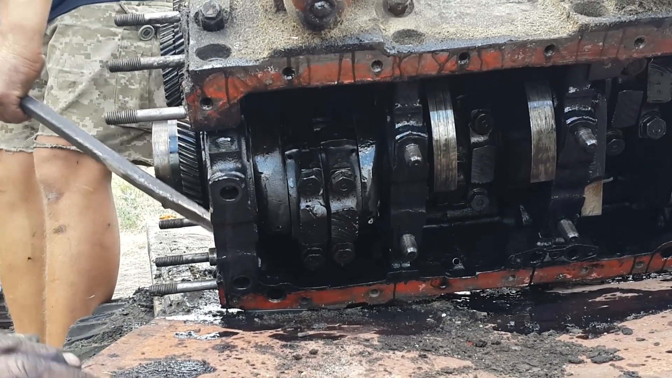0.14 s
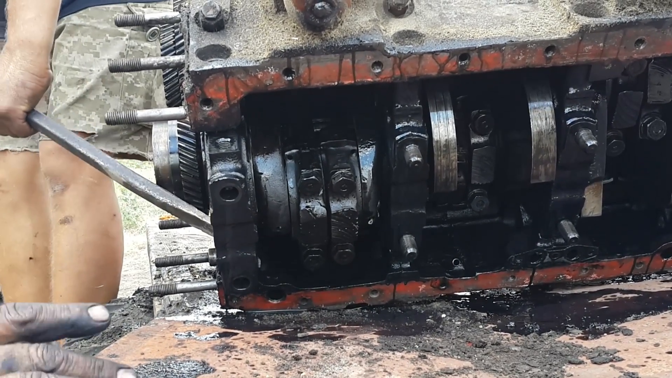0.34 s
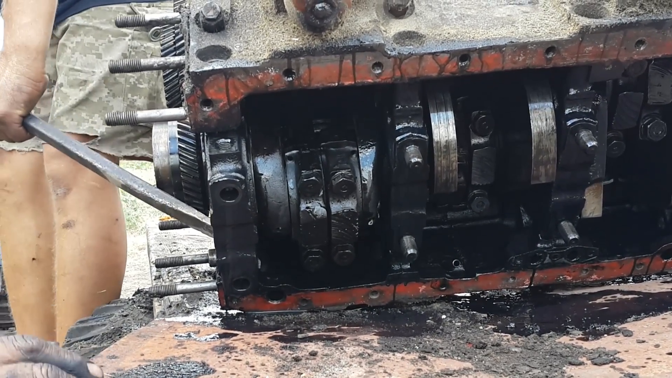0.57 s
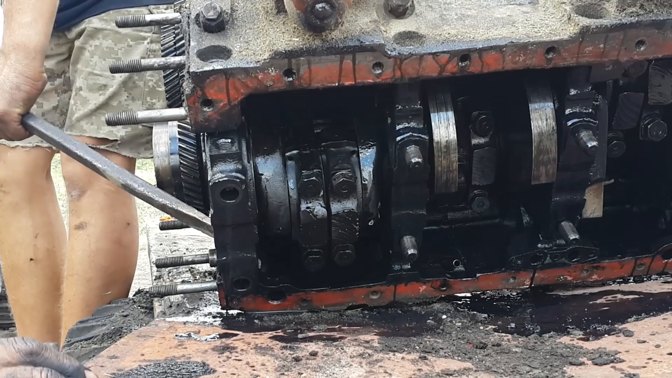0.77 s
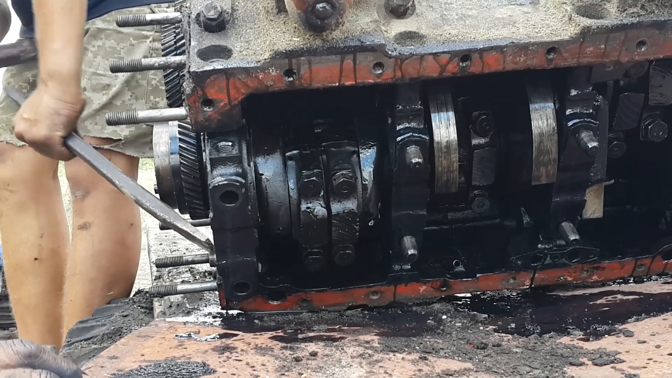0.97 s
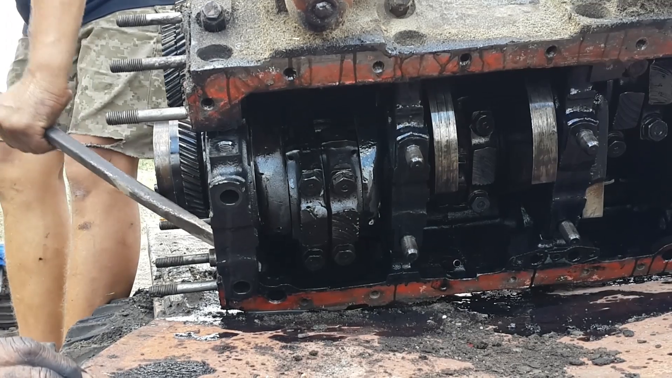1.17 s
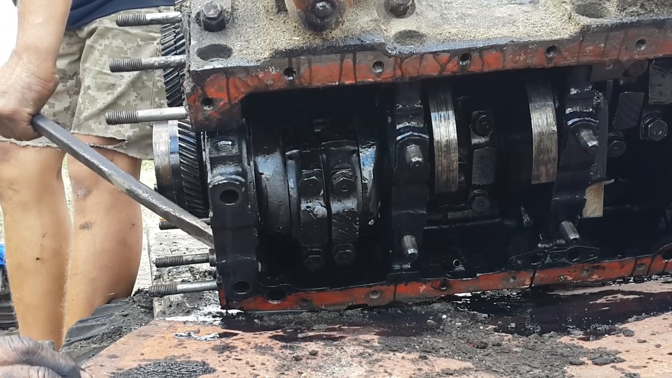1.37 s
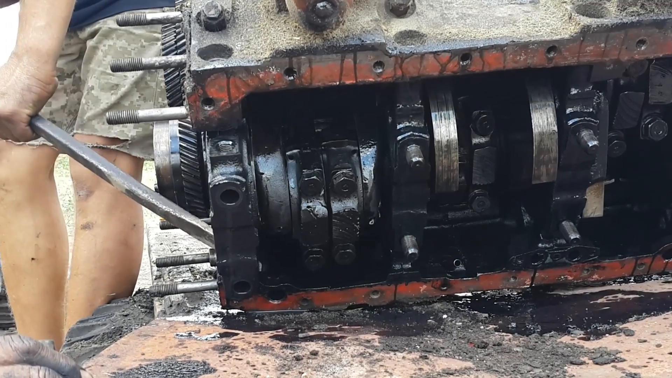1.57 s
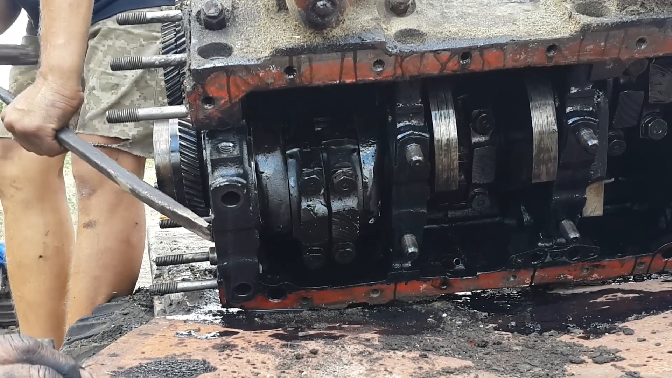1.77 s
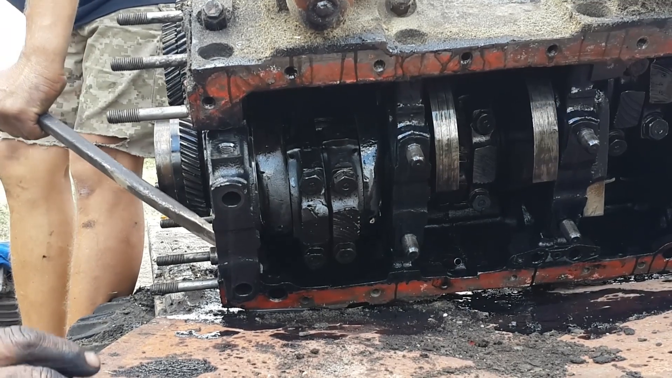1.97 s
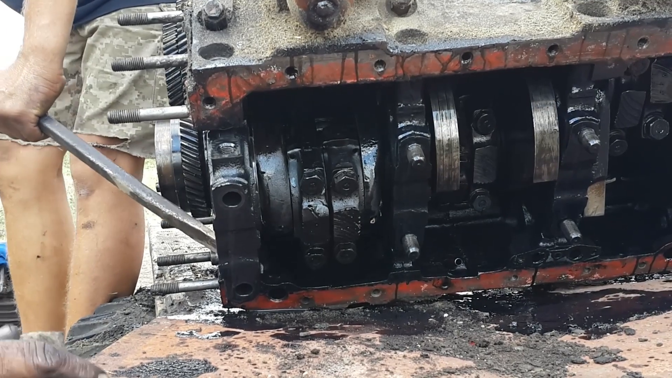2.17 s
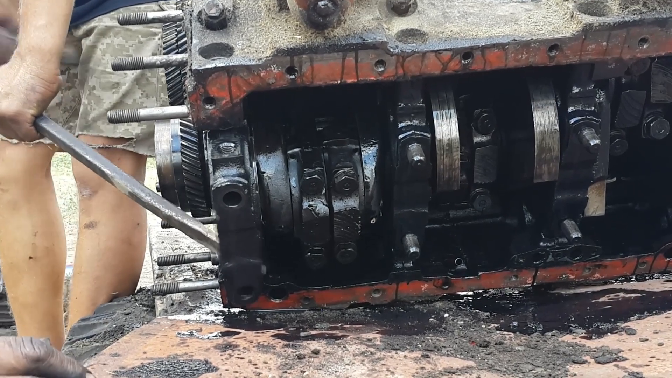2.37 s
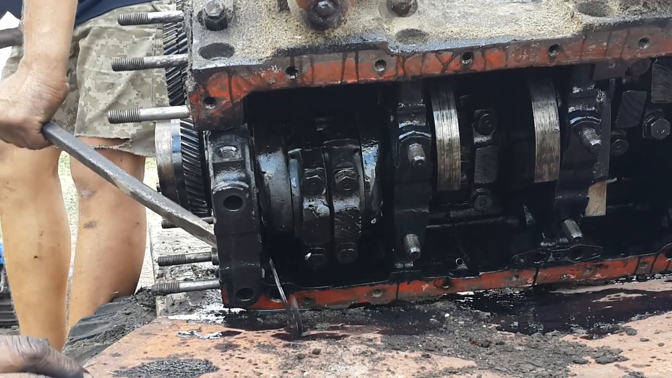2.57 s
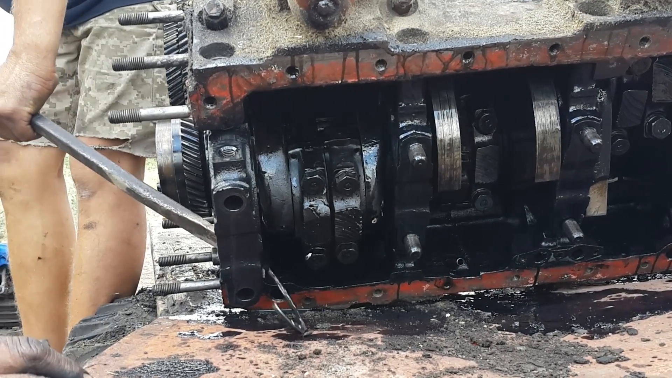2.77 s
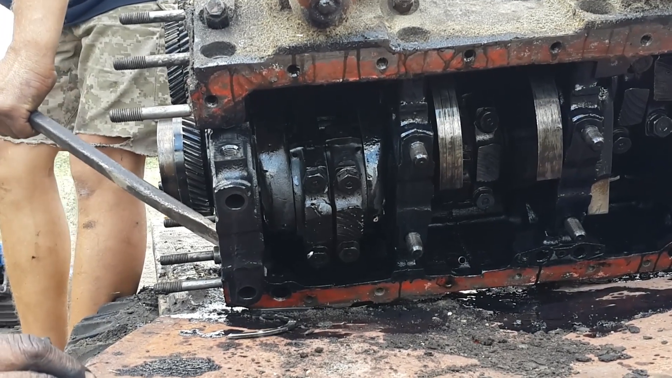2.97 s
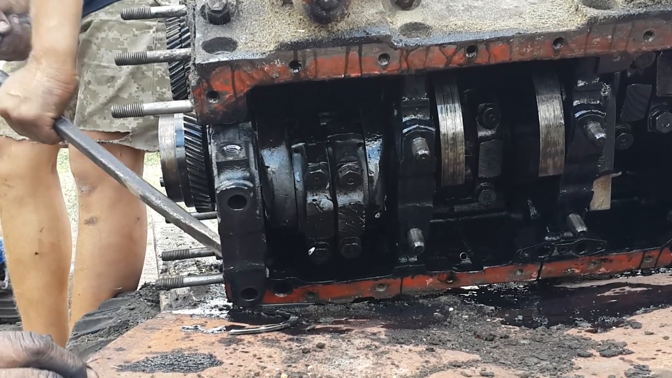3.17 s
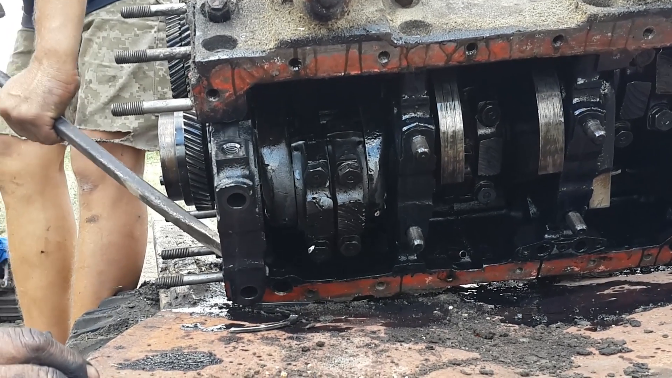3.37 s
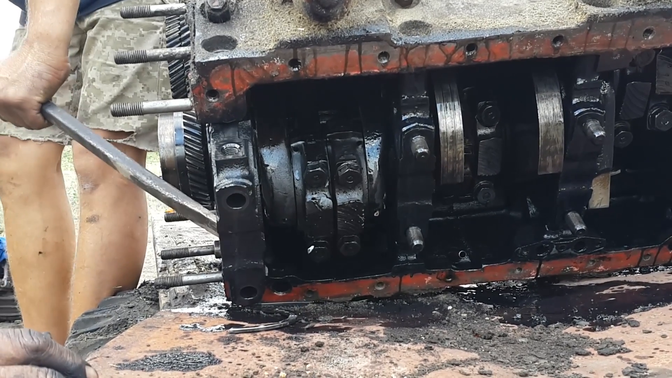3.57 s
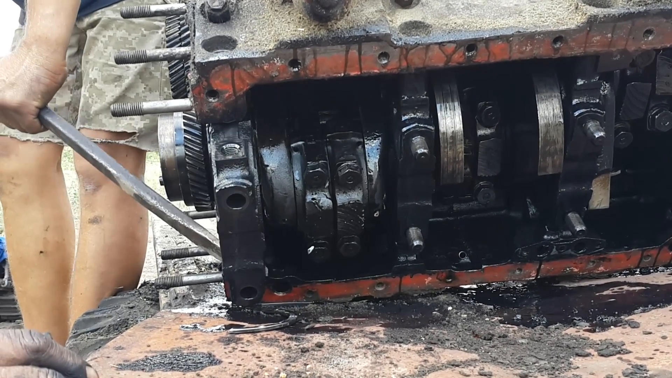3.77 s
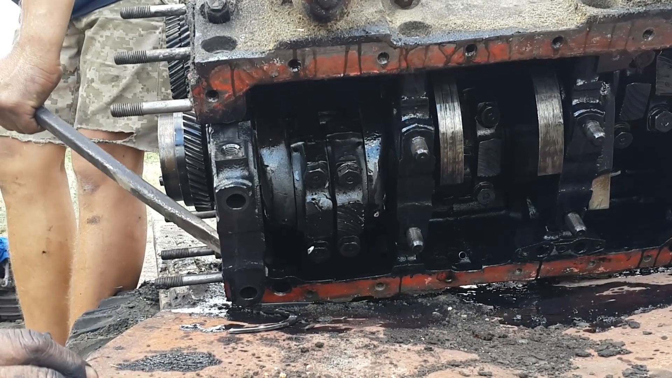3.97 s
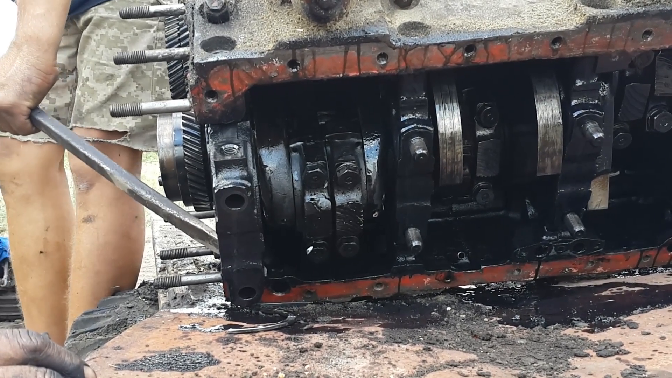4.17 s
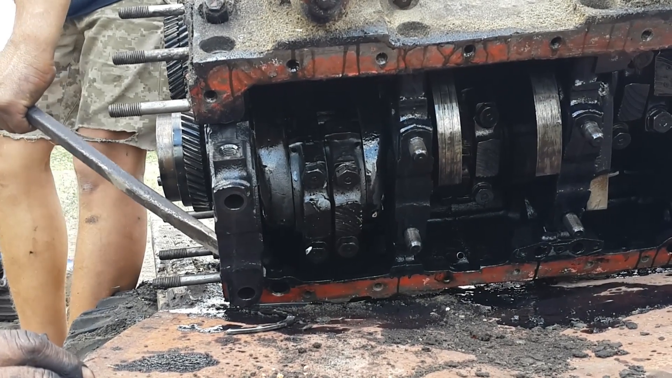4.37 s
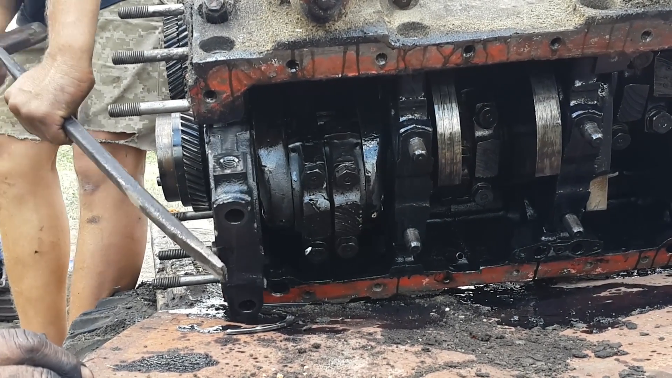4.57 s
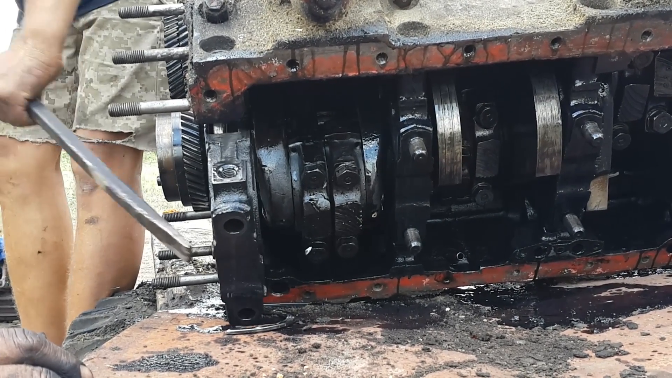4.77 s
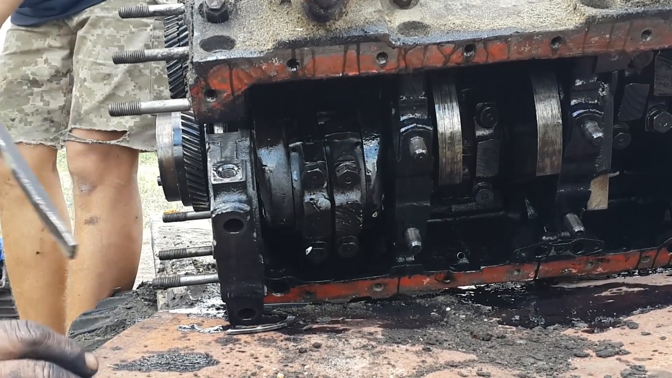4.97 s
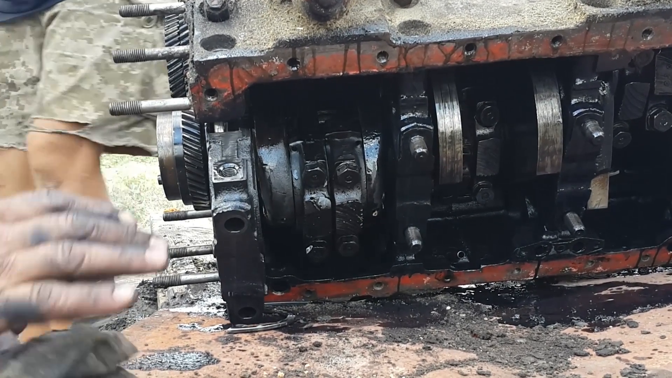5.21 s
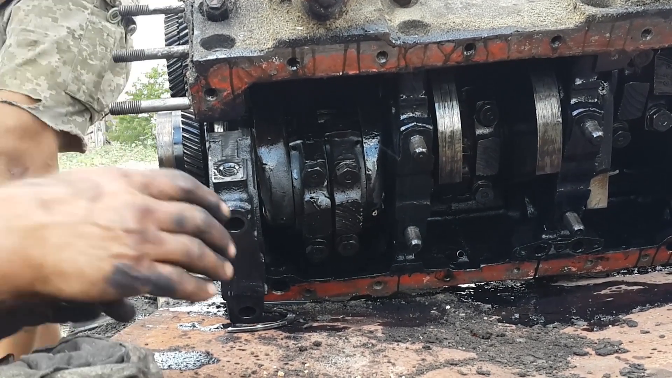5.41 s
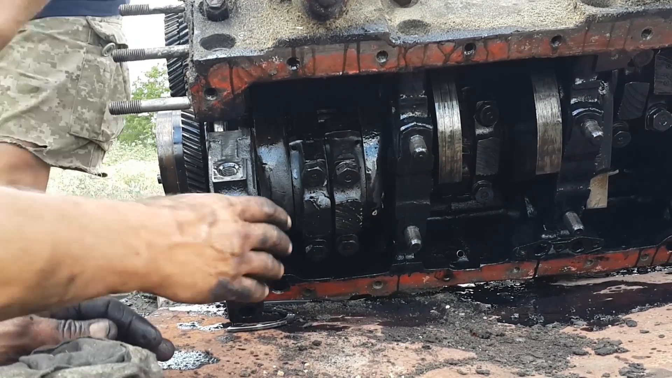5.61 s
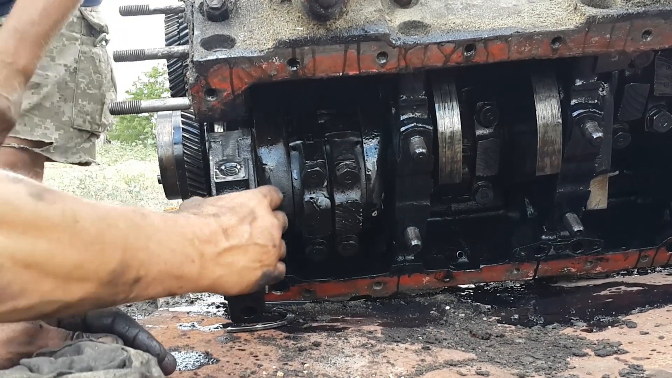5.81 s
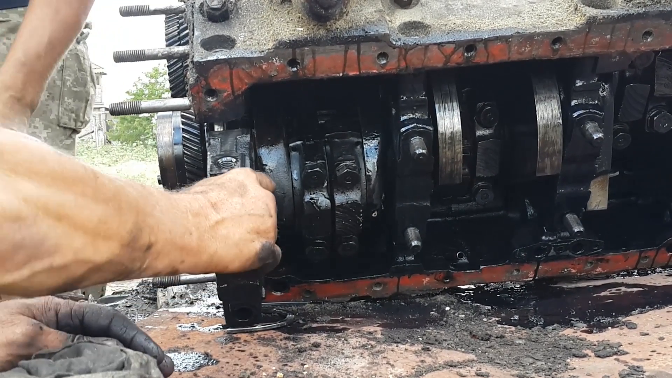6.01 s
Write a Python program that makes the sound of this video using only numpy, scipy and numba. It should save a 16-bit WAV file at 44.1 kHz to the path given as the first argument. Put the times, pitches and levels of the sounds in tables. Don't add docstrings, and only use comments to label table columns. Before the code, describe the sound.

Close outdoor phone pickup with wind buffeting, stronger on the left. A steel bar knocks a heavy engine block: a dull opening knock, then five hard, distorted clanks with quick rebounds and short rings. After the third, a small steel part drops and bounces. Later come scraping taps, a final blow breaking into rapid clatter, then soft knocks and hand rustle. A cricket chirps faintly.

```python
import sys
import numpy as np
from scipy import signal
from scipy.fft import rfft, irfft
from scipy.io import wavfile
from scipy.ndimage import uniform_filter1d
from numba import njit

SR = 44100
rng = np.random.default_rng(int(sys.argv[2]) if len(sys.argv) > 2 else 0)


def dump(signal):
    limited = np.clip(np.atleast_2d(signal).T, -1, 1)
    pcm = np.round(limited * 32767).astype(np.int16)
    wavfile.write(sys.argv[1], SR, pcm)


def voltage_ratio(level):
    return 10 ** (np.asarray(level, float) / 20)


N = 266751
TIME = np.arange(N) / SR

# (frequency [Hz], density [dB per Hz])
AIR = [(40, -5), (167, 1.5), (500, -12), (800, -21), (1700, -16), (6170, -14), (7540, -19.5),
       (16000, -20.5)]
AIR_DB = -75
WHINE_HZ, WHINE_DB, WHINE_SWITCH_HZ = 9335, -85, 30.2
# (time [s], peak [dB])
CHIRPS = [(1.638, -50), (1.679, -51), (1.72, -51), (1.759, -51), (1.8, -62), (3.2244, -52), (3.4824, -55.5),
          (5.0214, -53)]
# (frequency [Hz], level [dB], t60 [s])
CRICKET_WING = [(6000, 0, 0.0091), (8300, -2.5, 0.005), (13940, -10.5, 0.0076)]
# (start [s], length [s], left [dB], right [dB])
GUSTS = [(0.069, .45, -38, -68), (0.671, 0.16, -35.5, -68), (.83, .24, -29.5, -55.5), (1.2, .2, -32, -60.5),
         (1.471, 0.034, -25.5, -64), (1.658, .08, -37, -68), (2.041, .2, -30.5, -61),
         (2.25, .3, -33.5, -53.5), (2.599, .44, -32, -45), (3.101, .14, -42, -53.5),
         (3.379, .38, -35.5, -46), (3.859, 0.39, -54, -66), (4.881, .16, -42.5, -54.5),
         (5.182, .04, -55.5, -59.5), (5.36, .05, -56.5, -58.5), (5.66, .09, -45, -55),
         (5.83, .1, -36.5, -47), (5.97, .08, -47, -52)]
GUST_RISE_DB_S, GUST_FALL_DB_S, CALM_DB = 902.5, 348.5, -73.5
FLAP_HZ, FLAP_HZ_PER_DB = 205.3, 3.5
# (time [s], peak [dB])
PUFFS = [(0.304, -25.5), (0.429, -41.5), (0.473, -57), (0.886, -22.5), (0.894, -26), (0.997, -22),
         (1.31, -26), (1.466, -21), (1.688, -44), (2.053, -29.5), (2.166, -33), (2.276, -33), (2.34, -41),
         (3.007, -30.5), (3.067, -27), (3.52, -32), (5.895, -34)]
# (time [s], level [dB])
RUSTLE = [
    [(0.5, -75), (0.554, -63), (0.6, -77.5)],
    [(0.88, -77), (0.924, -65.5), (1.07, -67.5)],
    [(4.36, -76), (4.43, -62.5), (4.55, -68), (4.62, -74.5)],
    [(5.2, -64.5), (5.324, -59.5), (5.346, -69), (5.5, -68.5)],
    [(5.62, -69.5), (5.64, -64.5), (6.006, -52.5), (6.028, -59), (6.049, -44)],
]
# (time [s], level [dB])
SCRAPES = [
    [(3.54, -74.5), (3.602, -55.5), (3.696, -51), (3.73, -92)],
    [(3.87, -53), (3.916, -61.5), (4.0, -70.5), (4.02, -91)],
    [(4.64, -47), (4.74, -41.5), (4.82, -50), (4.86, -77)],
    [(4.02, -86), (4.064, -60), (4.112, -58), (4.13, -67), (4.145, -59.5), (4.18, -80)],
]
# (frequency [Hz], width [Hz], level [dB])
SCRAPE_RING = [(490, 50, 2), (1150, 40, -4), (1920, 46, -12), (2190, 46, -2), (3000, 42, -2),
               (3490, 41, -7), (4290, 99, -2), (5020, 91, -12), (5780, 42, -2), (6570, 28, -9),
               (7480, 43, -17), (8860, 110, -26), (9360, 41, -19)]
# (time [s], peak [dB], treble [dB], decay [s])
DROPS = [
    (2.7293, -9.5, -10.5, 0.19),
    (3.0899, -17, -3, 0.1),
    (3.1207, -16.5, -28, 0.16),
    (3.1333, -19.5, -15, 0.071),
]
# (time [s], peak [dB], treble [dB], decay [s])
BOUNCES = [(2.585, -9, -7.5, 0.019), (2.6547, -31, -7, 0.03), (2.6849, -33, -6, 0.02),
           (2.7046, -35, -28, 0.048), (2.809, -25.5, -8, 0.11), (2.864, -37, -6.5, .13),
           (2.9049, -36, -15, 0.24), (2.9445, -37.5, -2.5, 0.073), (2.9558, -40, -3, 0.07),
           (3.0353, -47.5, -3, 0.034), (3.0463, -45.5, -1.5, 0.058), (3.0584, -40.5, -4, 0.06)]
# (frequency [Hz], level [dB], t60 [s])
PART_MODES = [(2730, -10, .2), (4050, -3, .45), (4920, -1, .3), (5480, -12, .2), (6650, -8, .15),
              (7030, -8, .15), (8060, -3, .22), (8490, -8, .36), (11600, -12, .2), (12000, -16, .2),
              (14100, -10, .2)]
# (time [s], peak [dB], treble [dB], decay [s])
KNOCKS = [(0.0, -22, -15.5, 0.1), (0.1374, -56, -8, 0.11), (0.927, -44.5, -19, 0.11),
          (1.0151, -42.5, -19.5, 0.079), (4.745, -22, -7.5, 0.035), (4.754, -17.5, -6.5, 0.04),
          (4.7696, -21, -10, 0.06), (4.781, -21, -10.5, 0.06), (4.7971, -20.5, -12.5, 0.072),
          (4.8094, -22.5, -16.5, 0.059), (5.188, -34.5, -17.5, 0.109), (5.3737, -57, -18.5, .09),
          (5.604, -31, -5.5, 0.044), (5.753, -48.5, -4.5, 0.16), (5.7845, -46, -15.5, 0.15),
          (5.889, -40, -15.5, 0.14), (5.9732, -36.5, -20.5, 0.19), (5.9915, -33, -5, 0.06),
          (6.0394, -36.5, -61, 0.042)]
# (centre [Hz], level [dB], decay relative to the contact's own [ratio])
BLOCK_BANDS = [(108, -21, 1), (263, -19.5, 0.55), (515, -11.5, 0.76), (973, -7.5, 0.86), (1294, -4.5, 1.2),
               (2203, -3.5, 1.1), (2930, -6, .9), (4980, 0.5, 0.64), (7200, -7, .65), (10700, -5, 0.28),
               (13300, -19, 0.24)]
# (frequency [Hz], level [dB], t60 [s])
CAP_MODES = [(485, -19, 0.42), (1040, -7.5, 0.13), (1064, -6.5, 0.03), (1254, -5, 0.12), (1444, 0, 0.048),
             (1596, 3, 0.11), (1740, -7, .09), (2100, -0.5, 0.029), (2180, -1, 0.088), (2800, -1.5, 0.02),
             (2945, 3, 0.07), (3370, -1.5, .07)]
# (time [s], peak [dB], frequency [Hz], t60 [s])
PINGS = [(4.6164, -6, 4300, .05), (0.2528, -29, 2175, 0.096), (1.1, -18, 2993, 0.14),
         (1.316, -56.5, 4300, 0.15), (1.316, -57, 5800, .1), (1.351, -49.5, 7450, .08),
         (1.3514, -43, 5800, 0.073), (2.5702, -9, 1500, .06), (2.073, -36, 2990, .14),
         (2.2013, -48, 4280, 0.084), (2.612, -28, 10300, 0.041), (2.656, -31, 9900, .03),
         (2.656, -31, 6760, 0.033), (2.684, -33, 6100, .025), (2.706, -41, 6200, .025),
         (2.719, -46, 6200, .02), (2.609, -36, 4930, .5), (2.809, -33, 8060, 0.23),
         (2.864, -44, 7030, 0.18), (2.9056, -45.5, 6620, 0.17), (2.945, -46.5, 4910, 0.32),
         (2.946, -41, 8040, 0.15), (2.958, -39, 10000, .03), (3.0902, -7, 9900, 0.035),
         (3.0913, -37, 4054, .45), (3.0897, -42, 8489, 0.34), (3.09, -30, 8150, 0.1), (3.3, -15, 5825, .16),
         (3.342, -27, 7100, 0.042), (3.342, -26, 4990, .04), (3.3614, -31.5, 2990, 0.076),
         (3.3614, -38, 4280, .1), (4.635, -14, 5900, .2), (4.6605, -16, 4930, 0.029),
         (4.6762, -16, 5960, .04), (4.6762, -6, 8800, 0.055), (4.689, -15, 4900, 0.05),
         (4.699, -22, 8800, 0.074), (4.722, -19, 5730, 0.057), (4.7491, -16, 2260, 0.046),
         (4.754, -23, 3520, 0.044), (4.756, -24, 8400, .03), (4.77, -23, 4760, 0.053),
         (4.781, -25, 2800, 0.05), (4.793, -20.5, 4230, 0.035), (4.797, -22.5, 1610, .05),
         (4.809, -29, 3000, 0.059), (4.842, -44, 4260, 0.11), (5.95, -48, 1400, 0.054)]
# (time [s], peak [dB], treble [dB], decay [s])
TAPS = [(0.2528, -24.5, -49, 0.14), (0.3018, -46, -19, 0.23), (0.328, -28.5, -25, 0.039),
        (1.3144, -55, -12.5, 0.182), (1.3514, -29.5, -52.5, 0.13), (1.592, -55.5, -3, 0.044),
        (1.9044, -42, -17, 0.03), (2.073, -28, -60, 0.093), (2.1147, -47.5, -14, 0.048),
        (2.201, -35.5, -18, 0.052), (2.427, -68, -5, 0.045), (3.3609, -23.5, -13, 0.093),
        (3.8738, -36, -16, 0.122), (3.913, -39.5, -52, 0.14), (4.8424, -38.5, -13.5, 0.1),
        (4.8701, -37.5, -14.5, 0.1), (4.8779, -32.5, -13, 0.14)]
# (time [s], peak [dB], treble [dB])
REBOUNDS = [(1.1154, -8, -15.5), (1.1349, -19.5, -8.5), (1.8252, -1, -5.5), (1.8613, -19.5, -7),
            (2.6113, -15.5, -3.5), (3.3344, -17, -8), (4.6534, -14, -9), (4.6598, -16, -5),
            (4.6763, -12.5, -3), (4.6894, -15.5, -4), (4.6994, -11, -9)]
# (time [s], peak [dB], treble [dB], ring [dB], left minus right [dB])
BLOWS = [
    (1.0823, 5, -8, -13, 8),
    (1.812, 4.5, -8.5, -0.5, 2.5),
    (2.5697, 4.5, -10.5, 4, 3.5),
    (3.2854, 0.5, -4, 3, 5.5),
    (4.6161, 5, -6, 0, 5),
]
BLOW_DECAY_S, REBOUND_DECAY_S, CAP_LOOSE_S = 0.082, 0.075, 3.3
# (frequency [Hz], level [dB], t60 [s])
BAR_STRUCK = [
    [(1464, -8, 0.08), (2993, -3, .1), (4270, -10, 0.1), (5050, -6, 0.08), (5800, -6, 0.1),
     (6562, -12, 0.16), (6928, -14, 0.08), (8484, -5, 0.14), (10800, -17, 0.088), (14060, -18, 0.09),
     (14710, -49, 0.085)],
    [(2990, -9, 0.09), (2401, -2, 0.04), (3483, -2, 0.088), (4274, -7, 0.083), (5050, -7, 0.086),
     (5782, -10, 0.11), (6578, -13, 0.11), (8473, -32, 0.14), (10770, -30, 0.14), (11410, -39, 0.34),
     (12480, -22, 0.043)],
    [(2982, -5, 0.1), (3817, -17, 0.14), (4274, 0, 0.049), (5825, -7, 0.14), (6578, -17, 0.089),
     (8059, -25, 0.54), (8522, -14, 0.11), (8764, -21, 0.27), (10080, -19, 0.044), (11570, -25, 0.2),
     (14070, -34, 5.0)],
]
# (frequency [Hz], level [dB], t60 [s])
BAR_LOOSE = [
    [(1200, -4, .07), (2180, -10, .1), (2988, -4, .08), (3478, -4, .08), (4269, 0, .08), (5028, -12, .15),
     (5825, 0, .13), (6568, -7, .12), (8538, -17, .12), (11490, -26, .1)],
    [(2180, -6, .07), (2972, -7, .07), (3408, -8, .08), (4274, -3, .06), (4915, -9, .05), (5023, -10, .06),
     (5814, -4, .13), (5965, -7, .11), (8823, -11, .1), (11570, -20, .07), (15190, -24, .07)],
]
# (frequency [Hz], level [dB], t60 [s])
BAR_TAPPED = [(1148, -11, .09), (1906, 3, .11), (2182, -2, .09), (2988, -2, .11), (3483, -5, .08),
              (4280, -6, .09), (5040, -12, .09), (5800, -9, .1), (6568, -18, .11), (7480, -12, .06),
              (8520, -22, .08)]
# (frequency [Hz], level [dB], t60 [s])
BAR_LIFTED = [(1153, -2.5, 0.085), (1450, -11, 0.13), (2175, 2, 0.12), (2993, -3.5, 0.11),
              (3460, -11, 0.07), (4274, -2, .1), (5040, -5, 0.076), (5800, -5.5, 0.1), (6700, -18, 0.16),
              (6850, -17, 0.084), (7430, -16.5, 0.062)]
# (ring [dB], left minus right [dB])
REBOUND_KIND = (-0.65, 7)
TAP_KIND = (0.83, 10)
DROP_KIND = (-20, 4.5)
KNOCK_KIND = (0, 15)
BOUNCE_KIND = (-2, 8.3)
PORT_TWIST_RAD, TWIST_PERIOD_HZ = 2.2, 1900


def band(x, hz, width):
    edges = [hz / np.sqrt(width), min(hz * np.sqrt(width), .45 * SR)]
    y = signal.sosfilt(signal.butter(2, edges, "band", fs=SR, output="sos"), x)
    return y / y.std()


def pair(alike):
    alike = np.clip(alike, 0, 1)
    return np.sqrt(alike) * rng.standard_normal(N) + np.sqrt(1 - alike) * rng.standard_normal((2, N))


def sides(pan_db):
    return voltage_ratio(np.array([pan_db, -pan_db]) / 2)


def walk(rate):
    k = int(SR / rate)
    held = np.repeat(rng.standard_normal(N // k + 1), k)
    y = uniform_filter1d(uniform_filter1d(held, k), k)[:N]
    return y / y.std()


def spans(tables):
    return sum(voltage_ratio(np.interp(TIME, *np.transpose(rows), left=-200, right=-200)) for rows in tables)


@njit
def swept(x, hz, damp):
    y, b, l = np.empty(len(x)), 0., 0.
    for i in range(len(x)):
        g = np.tan(np.pi * hz[i] / SR)
        v = (b + g * (x[i] - l)) / (1 + g * (g + damp))
        b, l, y[i] = 2 * v - b, l + 2 * g * v, damp * v
    return y


def grit(rate, spread_db):
    sizes = voltage_ratio(spread_db * np.minimum(rng.exponential(size=N), 5))
    clicks = (rng.random(N) < rate / SR) * sizes * rng.standard_normal(N)
    return clicks / clicks.std()


def patchy(x, db, frames=9):
    hz, _, spec = signal.stft(x, SR, nperseg=256)
    streaks = uniform_filter1d(rng.standard_normal(spec.shape[1:]), size=frames, axis=1) * np.sqrt(frames)
    gain = voltage_ratio(db * streaks * np.clip(hz / 8000, .2, 1)[:, None])
    return signal.istft(spec * gain, SR, nperseg=256)[1][:, :N]


def rings(events, modes, db, longest_s, scatter_db, choke_s=0.034):
    out = np.zeros((2, N))
    hz, mode_db, t60 = np.transpose(modes)[:, :, None]
    left_db = 3.9 * np.clip(np.log2(hz / 2400), -1, 1)
    t = TIME[:int(SR * min(1.3 * longest_s, 1.5 * t60.max(), .5))]
    for (s, peak_db, treble_db, ring_db, decay, pan_db), after in zip(events, events[1:] + [(1e3,)]):
        chance = rng.standard_normal((4, len(modes), 1))
        tilt_db = .25 * (max(treble_db, -40) + 12) * np.log2(hz / 3000)
        fade = voltage_ratio(-60 * t / np.clip(np.minimum(t60, longest_s) * (decay / .1) ** .5, .005, 2))
        choke = voltage_ratio(-60 * np.maximum(t - (after[0] - s), 0) / choke_s)
        onset = 1 - np.exp(-t / .0003)
        wave = voltage_ratio(mode_db + tilt_db + scatter_db * chance[0]) * fade * choke * onset
        wave = wave * np.sin(2 * np.pi * hz * (1 + .001 * chance[1]) * t)
        both = np.array([(voltage_ratio(2 * c + side * left_db) * wave).sum(axis=0)
                         for c, side in zip(chance[2:], (1, -1))])
        i = int(max(s, 0) * SR)
        out[:, i:i + len(t)] += (voltage_ratio(db + peak_db + ring_db) * sides(pan_db)[:, None] * both)[:, :N - i]
    return out


def contacts():
    blows = [(s, db, treble, ring, BLOW_DECAY_S, pan) for s, db, treble, ring, pan in BLOWS]
    rebounds = [(*row, REBOUND_DECAY_S) for row in REBOUNDS]
    kinds = zip((rebounds, TAPS, DROPS, KNOCKS, BOUNCES),
                (REBOUND_KIND, TAP_KIND, DROP_KIND, KNOCK_KIND, BOUNCE_KIND))
    return [blows] + [[(s, db, treble, ring, decay, pan) for s, db, treble, decay in rows]
                      for rows, (ring, pan) in kinds]


def air():
    hz = np.maximum(np.fft.rfftfreq(N, 1 / SR), 1)
    curve_hz, curve_db = np.transpose(AIR)
    shape = voltage_ratio(np.interp(np.log(hz), np.log(curve_hz), curve_db))
    shape /= np.sqrt(2 * np.sum(shape[hz > 1000] ** 2) / N)
    hush = irfft(rfft(pair(0.07)) * shape, N) * voltage_ratio(AIR_DB + 1.0 + walk(0.74))
    gate = uniform_filter1d(1. * ((TIME * WHINE_SWITCH_HZ + .2) % 1 < .65), size=60)
    return hush + voltage_ratio(WHINE_DB + 6) * gate * np.sin(2 * np.pi * WHINE_HZ * TIME)


def cricket(stroke_s=.0058, db=-6):
    strokes = [(s + k * stroke_s, peak_db, -12, 0, .1, 3) for s, peak_db in CHIRPS for k in range(4)]
    return rings(strokes, CRICKET_WING, db, 1, 0.92)


def eddy_band(eddies, hz, damp):
    for _ in range(3):
        eddies = swept(eddies, hz, damp)
    return eddies


def wind(spray_db=-16, spray_per_db=3.0, mist_db=-36, boom_db=-17, jolt=1.8):
    s, length, *ports = np.transpose(GUSTS)[:, :, None]
    outside_db = GUST_RISE_DB_S * np.maximum(s - TIME, 0) + GUST_FALL_DB_S * np.maximum(TIME - s - length, 0)
    out = []
    for db in ports:
        slow_db = np.maximum((db - outside_db).max(axis=0), CALM_DB)
        puff = 6 * np.tanh(.75 * walk(35))
        hz = np.clip((FLAP_HZ + FLAP_HZ_PER_DB * (slow_db + 35)) * 2 ** (.2 * walk(25)), 70, 400)
        eddies = grit(1200, 1.5)
        flap = eddy_band(eddies, 0.87 * hz, 1.426)
        spray = eddy_band(eddies, 1.8 * hz, 0.51)
        mist = eddy_band(eddies, 1.4 * hz, 1.0)
        boom = eddy_band(eddies, 0.28 * hz, 0.5)
        push_db = spray_per_db * (np.clip(slow_db + jolt * puff, -60, -29) + 30)
        shape = flap / flap.std() + voltage_ratio(boom_db) * boom / boom.std()
        shape += voltage_ratio(spray_db + push_db) * spray / spray.std()
        shape += voltage_ratio(mist_db + 2 * push_db) * mist / mist.std()
        out.append(voltage_ratio(slow_db + puff) * shape)
    return np.array(out)


def slaps(db=-3, length_s=0.028, hz=444.0):
    s, peak_db = np.transpose(PUFFS)[:, :, None]
    since = np.maximum(TIME - s, 0) / length_s
    burst = (voltage_ratio(peak_db + db) * (1 - np.exp(-36 * since)) * np.exp(-3 * since) * 2).sum(axis=0)
    body = eddy_band(rng.standard_normal(N), np.full(N, hz), 1.6)
    return burst * body / body.std() * np.array([[1], [0]])


def rustle():
    grain = patchy(pair(0.28) + 0.55 * grit(1000, 2.5), 2.5)
    # (centre [Hz], edge ratio, level [dB])
    bands = ((4600, 5.3, -1), (5400, 1.7, -14), (11000, 3.3, -7), (1900, 1.5, -7.5), (750, 1.9, -8))
    hiss = sum(voltage_ratio(db + 1.5 * walk(16)) * band(grain, hz, width) for hz, width, db in bands)
    return spans(RUSTLE) * voltage_ratio(1.8 * walk(33) - 0.5) * hiss * sides(0.89)[:, None]


def scraping(ring_db=-2, rasp_db=-4):
    slips = grit(1500, 2.5) * spans(SCRAPES) * voltage_ratio(3.5 * walk(40))
    ring = np.zeros(N)
    for hz, width, db in SCRAPE_RING:
        centre = np.full(N, 1. * hz)
        mode = swept(swept(slips, centre, 2 * width / hz), centre, 8 * width / hz)
        ring += voltage_ratio(db) * mode * np.sqrt(SR / width / 8)
    rasp = band(slips, 1100, 3.0) * slips.std()
    return (voltage_ratio(ring_db) * ring + voltage_ratio(rasp_db) * rasp) * sides(9.7)[:, None]


def loose_part(drops, bounces):
    return rings(sorted(drops + bounces), PART_MODES, -19, .6, 3.5, .1)


def block(events, rise_s, tail_db=-25, tail_dull_db=3, tail_s=0.24, low_stays=0.97, high_left_db=4):
    out, t = np.zeros((2, N)), TIME[:SR // 3]
    rise, noise = 1 - np.exp(-t / rise_s), patchy(pair(0.2), 3.5)
    for hz, db, longer in BLOCK_BANDS:
        power = np.zeros((2, N))
        octaves = np.log2(hz / 2000)
        tail_t60 = tail_s * max(900 / hz, 1) ** low_stays
        tail = voltage_ratio(tail_db - tail_dull_db * max(octaves, 0) - 60 * t / tail_t60)
        for s, peak_db, treble_db, _, decay, pan_db in events:
            fade = voltage_ratio(-60 * t / (np.clip(decay, .01, 1) * longer)) + tail
            colour_db = .5 * (treble_db + 7.5) * max(octaves, 0) ** 1.8
            gain = voltage_ratio(peak_db + db + colour_db) * sides(pan_db + high_left_db * np.clip(octaves, -1, 1))
            i = int(max(s, 0) * SR)
            power[:, i:i + len(t)] += (gain[:, None] ** 2 * (fade * rise) ** 2)[:, :N - i]
        out += np.sqrt(power) * band(noise, hz, 1.543)
    return out


def cap(blows, knocks):
    events = [(*c[:3], 0, *c[4:]) for c in sorted(blows + knocks)]
    return rings(events, CAP_MODES, -21, 0.42, 4.6, .1)


def pings(rise_s=0.00039, pan_db=6, rough_db=3.0):
    out = np.zeros((2, N))
    for s, peak_db, hz, t60 in PINGS:
        t = TIME[:int(SR * np.clip(t60, .01, .5))]
        wave = voltage_ratio(peak_db - 60 * t / t60) * (1 - np.exp(-t / rise_s)) * np.sin(2 * np.pi * hz * t)
        i = int(s * SR)
        out[:, i:i + len(t)] += (sides(pan_db)[:, None] * wave)[:, :N - i]
    return out * voltage_ratio(rough_db * walk(150))


def bar(blows, rebounds, taps):
    seated = [c for c in taps if c[0] < CAP_LOOSE_S]
    lifted = [c for c in taps if c[0] > CAP_LOOSE_S]
    out = rings(seated, BAR_TAPPED, -9, .2, 2.5)
    out += rings(blows, BAR_TAPPED, -13, .07, 3.5)
    out += rings(lifted, BAR_LIFTED, -7, .25, 2.5)
    for blow, modes in zip(blows, BAR_STRUCK + BAR_LOOSE):
        own_rebounds = [r for r in rebounds if 0 < r[0] - blow[0] < .5]
        out += rings([blow] + own_rebounds, modes, -9, .2, 3, .15)
    return out


def scene():
    blows, rebounds, taps, drops, knocks, bounces = contacts()
    thuds = voltage_ratio(-3.5) * block(blows + drops, 0.00054)
    thuds += voltage_ratio(-8.5) * block(rebounds + knocks, 0.0016)
    thuds += voltage_ratio(-6.0) * block(taps + bounces, 0.0011)
    work = scraping() + loose_part(drops, bounces) + thuds
    work += cap(blows, knocks) + pings() + bar(blows, rebounds, taps)
    hz = np.fft.rfftfreq(N, 1 / SR)
    twist = PORT_TWIST_RAD * np.clip(hz / 1800, .2, 1) * np.cos(2 * np.pi * hz / TWIST_PERIOD_HZ)
    work[0] = irfft(rfft(work[0]) * np.exp(1j * twist), N)
    return air() + cricket() + wind() + slaps() + rustle() + work


def top_cut(x):
    return signal.sosfilt(signal.butter(12, 16380, fs=SR, output="sos"), x)


def record(dry):
    x = signal.sosfilt(signal.butter(2, 60, "high", fs=SR, output="sos"), dry)
    x = np.clip(x, -.9, .9)
    x = signal.sosfilt(signal.butter(14, 15500, fs=SR, output="sos"), x)
    return top_cut(x)


dry = scene()
out = record(dry)
dump(out)
```